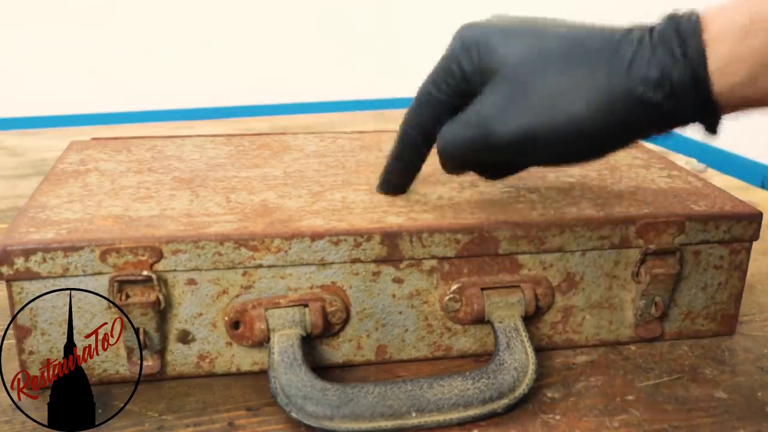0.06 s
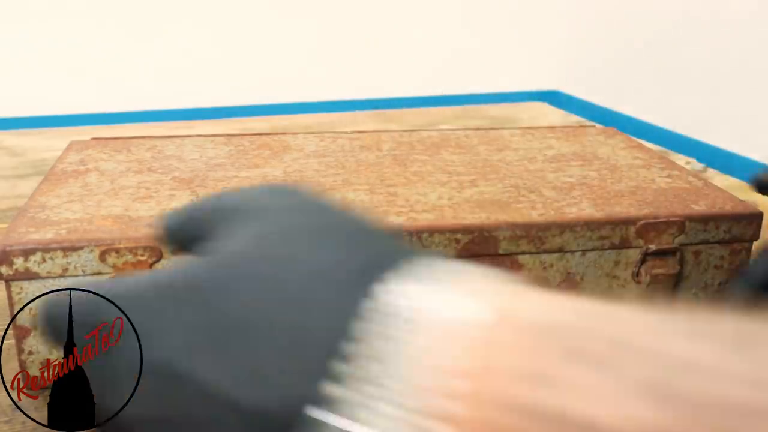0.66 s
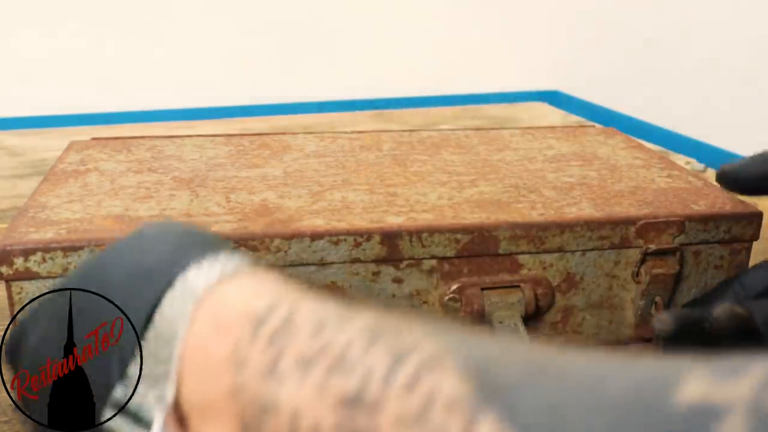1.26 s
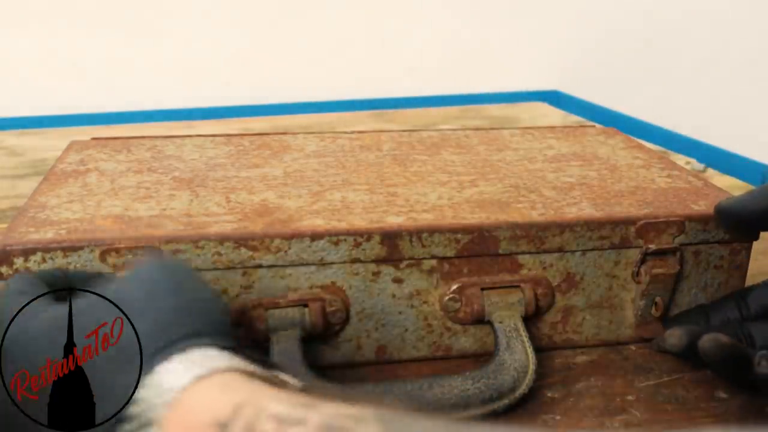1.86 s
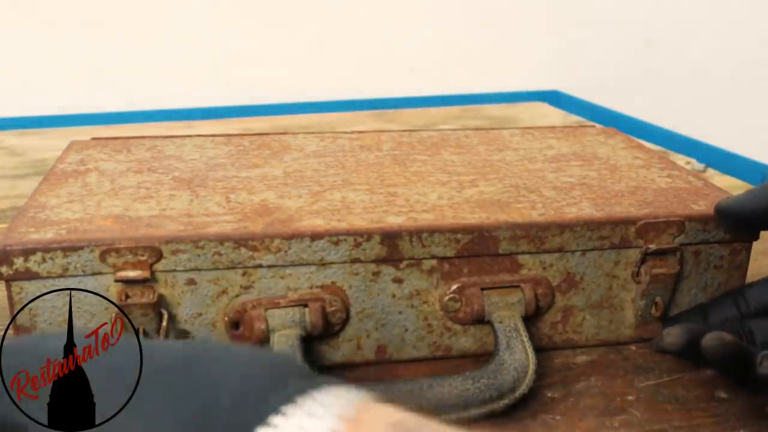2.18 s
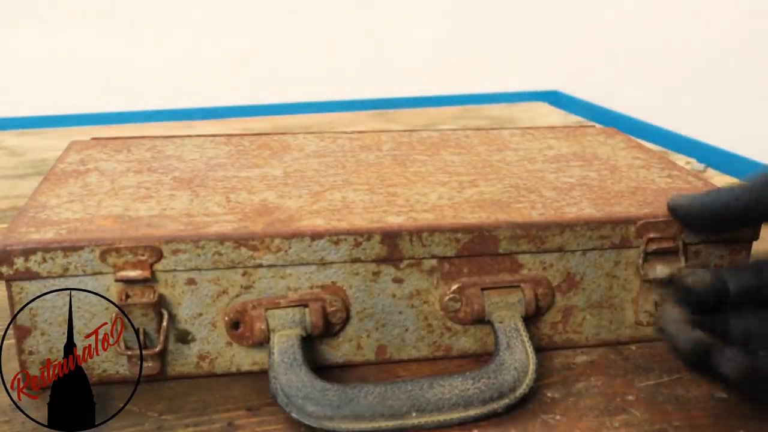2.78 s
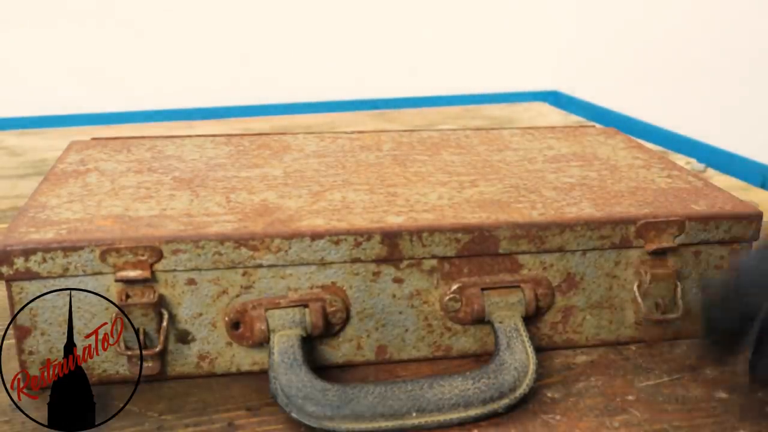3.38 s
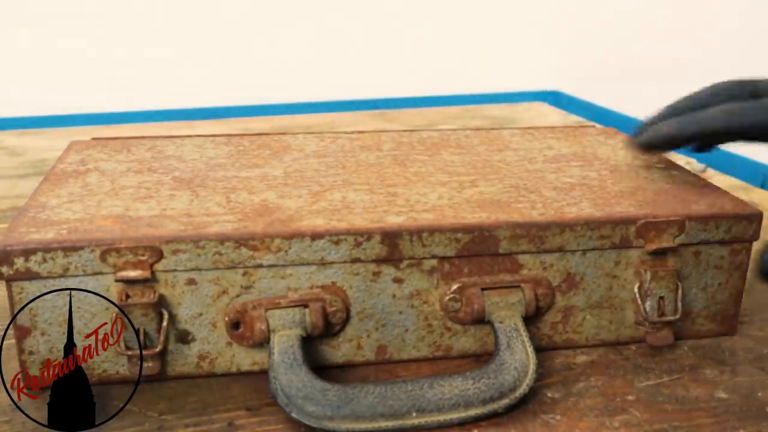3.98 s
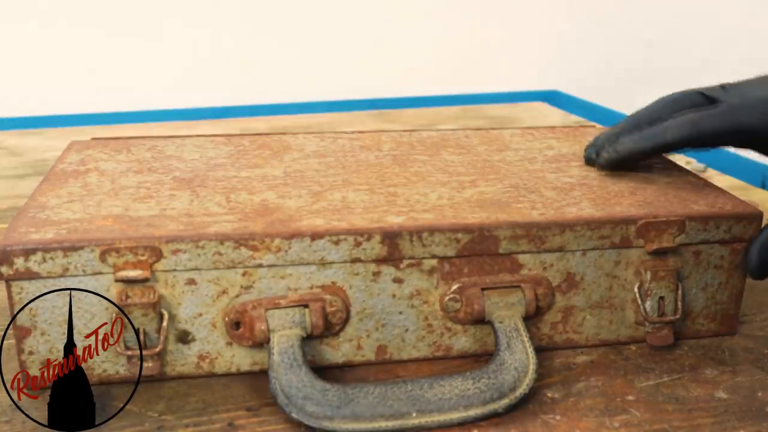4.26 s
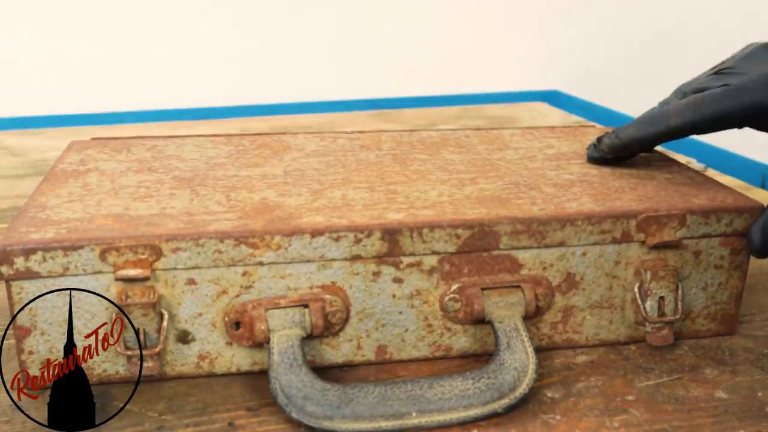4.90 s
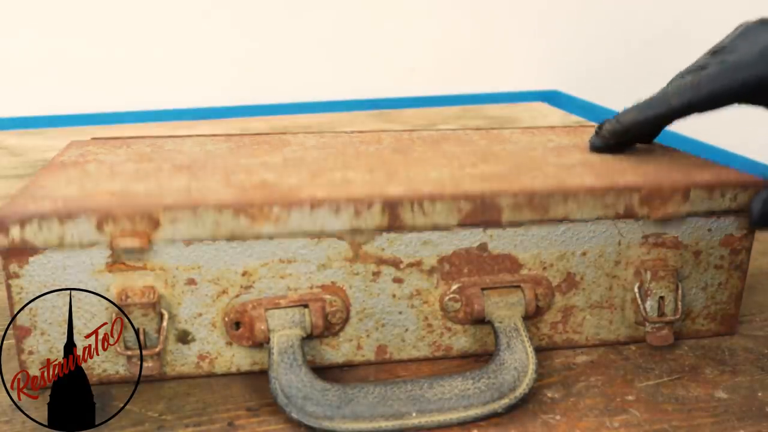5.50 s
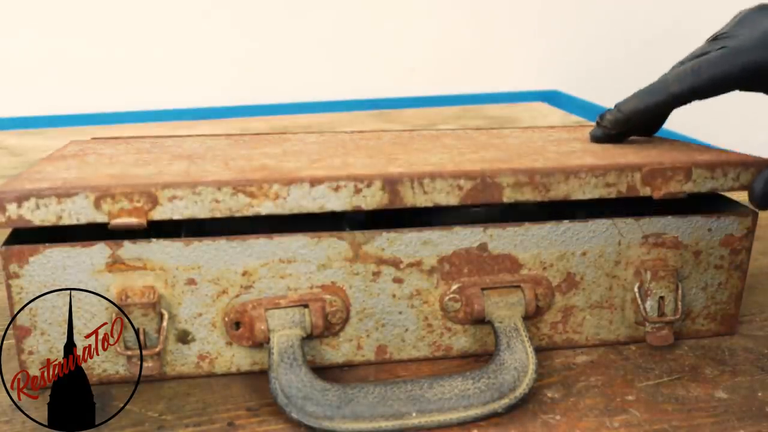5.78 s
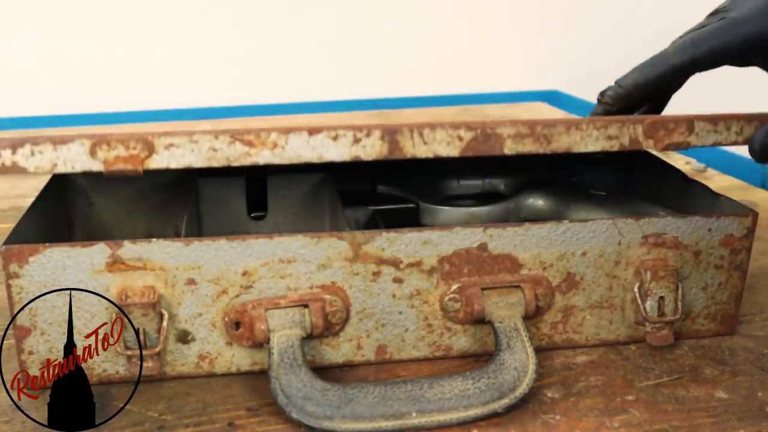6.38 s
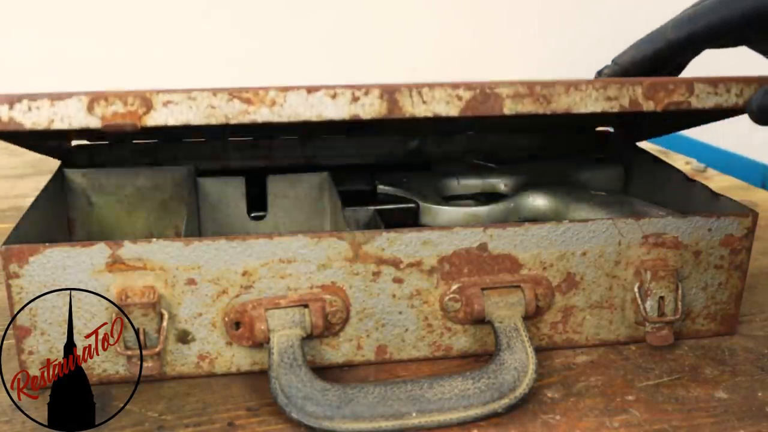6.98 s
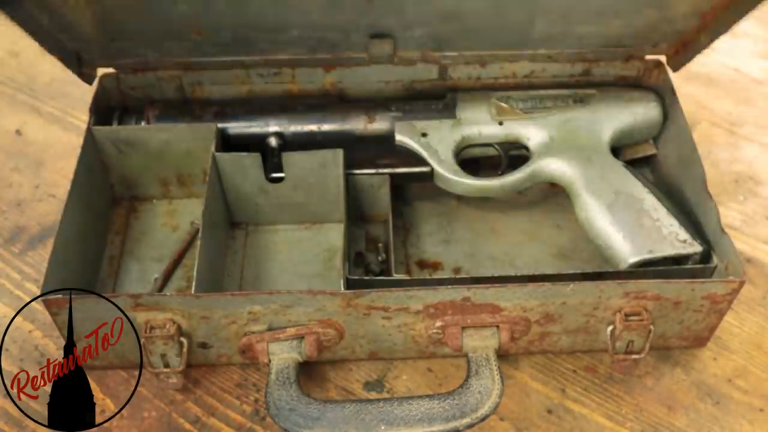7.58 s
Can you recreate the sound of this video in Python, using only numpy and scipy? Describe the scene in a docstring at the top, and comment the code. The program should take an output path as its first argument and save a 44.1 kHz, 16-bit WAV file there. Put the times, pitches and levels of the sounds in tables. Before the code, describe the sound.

A gloved finger lands on a hollow steel case with a dull thump and gritty rub at 0.1 seconds, then rubber swishes across the metal around 0.7. From 1 second, small steel clicks, grinding rust and faint glove creases build as the first latch is worked; it judders and snaps at 2.2. The second latch clicks from 2.6, cracks sharply at 2.85 and releases with the loudest quick double snap at 3.5, briefly ringing the box. Soft glove strokes follow around 3.7 and 4.4. After a near-silent pause, the lid comes unstuck at 5.5 with a small bump, click and scrape. Dry hinges scrape faintly from 6 seconds, with a slight knock at 6.7, a clearer dull one at 7 and a barely audible squeak at 7.5. Everything is close, in a small workshop with short reverberation and very low hiss and hum.

```python
"""A small workshop, one microphone close to a rusty sheet-steel case on a wooden bench.
Rubber gloves crease, a finger thumps the lid, rust grinds under a push and a glove brushes across.
Two stiff latches click and snap open, steel on steel, ringing the hollow case and the room.
The lid comes unstuck and rises, scraping, knocking and faintly squeaking on its dry hinges.
A noise suppressor and a limiter are in the chain, with low hiss and mains hum underneath."""
import sys
import numpy as np
from scipy import signal
from scipy.fft import rfft, irfft
from scipy.io import wavfile
from scipy.ndimage import uniform_filter1d, minimum_filter1d

SR = 44100
rng = np.random.default_rng(int(sys.argv[2]) if len(sys.argv) > 2 else 0)


def store_wav(level_fs):
    """Save 16-bit WAV to argv[1]."""
    pcm = np.round(np.clip(np.atleast_2d(level_fs), -1, 1) * 32767)
    wavfile.write(sys.argv[1], SR, pcm.T.astype(np.int16))


N = 337056
TIME = np.arange(N) / SR

# edges of the five bands of a blow (frequency [Hz])
BAND_EDGES = [70, 450, 1500, 4000, 8000, 16000]
# ringing of the steel box and its latch plates (frequency [Hz], level [dB])
CASE_MODES = [(135, -8.5), (222, 4.5), (262, 0.5), (320, -4.5), (350, -2), (468, 6.5), (571, -3),
              (690, 5.5), (792, 5), (881, 8.5), (926, -3.5), (998, 2), (1052, 0), (1112, 4), (1288, -2),
              (1379, -3.5), (1502, -7.5), (2030, -3), (2150, 1.5), (2482, 0.5), (2825, -6), (3064, -5),
              (3091, -12), (3203, -6.5), (3487, -9.5), (3520, -3.5), (4043, -7), (5265, -7), (5862, -6.5),
              (8710, -5)]
# colour of creasing rubber (frequency [Hz], level [dB])
RUBBER_COLOUR = [(500, -14), (2000, -10.5), (3400, -6), (4400, -5.5), (5800, -7.5), (8000, -14),
                 (12000, -16.5), (16000, -41)]


def amp(db):
    """Decibels to gain."""
    return 10 ** (np.asarray(db) / 20)


def unit(x):
    """Scales to an rms of one."""
    return x / np.sqrt(np.mean(x ** 2) + 1e-20)


def read(points, hz):
    """Reads a table along a logarithmic frequency axis."""
    f, value = np.transpose(points)
    return np.interp(np.log(hz + 1), np.log(f + 1), value)


def coloured(x, colour):
    """Gives x a spectrum, at an rms of one."""
    hz = np.fft.rfftfreq(len(x), 1 / SR)
    return unit(irfft(rfft(x) * amp(read(colour, hz)), len(x)))


def add(mix, s, sound):
    """Mixes a sound in at time s."""
    part = mix[round(s * SR):][:len(sound)]
    part += sound[:len(part)]


def gesture(s, hold_s, db, attack_s, release_s, sag_db_per_s=0):
    """Gain of a hand movement: swells to db at s, sags while held, fades; 30 dB per attack or release."""
    early = np.maximum(s - TIME, 0)
    late = np.maximum(TIME - s - hold_s, 0)
    sag_db = sag_db_per_s * np.clip(TIME - s, 0, hold_s)
    return amp(np.maximum(db - sag_db - 30 * (early / attack_s + late / release_s), -200))


def friction(colour, grains_per_s, spread_db, smooth):
    """Many tiny slips of uneven size over a smooth hiss, coloured by what they shake."""
    sizes = amp(spread_db * np.minimum(rng.exponential(1, N), 4)) * rng.choice([-1, 1], N)
    slips = unit(sizes * (rng.random(N) < grains_per_s / SR))
    return coloured(slips + smooth * rng.standard_normal(N), colour)


def tilted(x, rows, pivot_hz=1000):
    """Each push or stroke has its own brightness: tilts the spectrum by the last column, level kept."""
    hz, t, z = signal.stft(x, SR, nperseg=512)
    s, *_, tilt = np.transpose(rows)
    octaves = np.log2(np.clip(hz, 200, 6000) / pivot_hz)
    gain = amp(octaves[:, None] * np.interp(t, s, tilt))
    power = np.mean(abs(z) ** 2, axis=1, keepdims=True)
    gain /= np.sqrt((power * gain ** 2).sum(0) / power.sum())
    return signal.istft(z * gain, SR, nperseg=512)[1][:N]


def ringing(x, modes, ring_db, low_t60, high_t60):
    """Modes ring on after x shakes them, for low_t60 seconds at 200 Hz to high_t60 at 6 kHz."""
    t = np.arange(SR) / SR
    ring = np.zeros(SR)
    for hz, db in modes:
        t60 = read([(200, low_t60), (6000, high_t60)], hz)
        ring += amp(db - 60 * t / t60) * np.cos(2 * np.pi * hz * t)
    return amp(ring_db) * signal.fftconvolve(x, ring / np.linalg.norm(ring))[:N]


def contact_db(brightness, pivot_band, soft_roll_off=.6):
    """Tilt of the five bands: hard contact lifts the treble, soft contact rounds it off."""
    edges = np.log2(BAND_EDGES)
    octaves = (edges[:-1] + edges[1:]) / 2
    above_middle = np.maximum(octaves - octaves[2], 0)
    rounding_db = soft_roll_off * min(brightness, 0) * above_middle ** 2
    return brightness * (octaves - octaves[pivot_band]) + rounding_db


def knock(band_db, t60, part_hz, part_db, echo_s=.009, rise_s=.00089, crack_s=.00034):
    """One blow: a crack and its reflection off the wall behind, dense steel modes, the struck part's note."""
    # colour of struck steel (frequency [Hz], level [dB])
    steel_colour = [(70, -30.5), (130, -10), (220, 4), (380, -1), (560, -7), (950, 4.5), (1350, 2),
                    (1900, 1.5), (2600, 2), (3400, 1), (4300, -11.5), (5500, -4.5), (8000, -18.5),
                    (16000, -23)]
    t = np.arange(8192) / SR
    envelope = (1 - np.exp(-t / rise_s)) * amp(-60 * t / t60)
    crack = np.exp(-t / crack_s) + .74 * (t > echo_s) * np.exp(-abs(t - echo_s) / crack_s)
    burst = coloured(rng.standard_normal(len(t)), steel_colour) * envelope * (1 + 1.5 * crack)
    # small hard parts cannot drive the deepest bending of the lid
    low_cut = signal.butter(4, min(part_hz / 3, 165), "high", fs=SR, output="sos")
    burst = signal.sosfilt(low_cut, burst)
    out = np.zeros(len(t))
    for k, db in enumerate(band_db):
        band_pass = signal.butter(4, BAND_EDGES[k:k + 2], "band", fs=SR, output="sos")
        damping = np.exp(-.004 * BAND_EDGES[k] * t)  # rust damps the treble first
        band = signal.sosfilt(band_pass, burst) * damping
        out += amp(db) * band / np.linalg.norm(band)
    # the struck part rings as a close pair of modes, building up over its first cycle
    phase = 2 * np.pi * part_hz * t
    pair = np.sin(phase) + .6 * np.sin(phase * rng.uniform(1.02, 1.05))
    note = pair * (1 - np.exp(-t * part_hz)) * amp(-60 * t / (.99 * t60))
    out += amp(part_db) * note / np.linalg.norm(note)
    return np.sqrt(.02 * SR) * out  # levels count as rms over 20 ms


def glove_crinkle(creak_t60=.017):
    """Thin rubber creases in tiny bright snaps, which creak briefly, as the fingers flex and grip."""
    # flexes of the fingers (time [s], hold [s], level [dB])
    flexes = [(0.027, 0.064, -68), (0.094, .004, -60), (0.957, 0.013, -48), (1.123, .004, -53.5),
              (1.17, 0.0092, -40.5), (1.264, 0.0047, -51.5), (1.296, .003, -45), (4.242, 0.058, -60),
              (4.823, .003, -67), (4.89, 0.0038, -51.5), (4.934, 0.013, -63), (5.46, 0.0048, -69)]
    # stretched rubber squeaking against steel (frequency [Hz], level [dB])
    rubber_modes = [(3150, -7.5), (3450, -1), (5350, -4), (5900, -3)]
    effort = sum(gesture(*row, attack_s=.034, release_s=.068) for row in flexes)
    snaps = friction(RUBBER_COLOUR, grains_per_s=490, spread_db=1, smooth=.74)
    creak = unit(ringing(snaps, rubber_modes, 0, creak_t60, creak_t60))
    return unit(snaps + creak) * effort


def panel_thumps(ring_db=3):
    """Dull, bassy thumps of the panels: finger bumps, and the lid coming free."""
    # thumps (time [s], level [dB], brightness [dB/octave], t60 [s], panel pitch [Hz])
    thumps = [(0.1105, -26.5, 1.5, 0.046, 143), (0.149, -37, -8, 0.025, 348), (3.301, -48, -0.5, .11, 341),
              (4.889, -61, 4, 0.18, 354), (5.135, -63.5, -1.5, .08, 235), (5.165, -68, 3, 0.086, 150.4),
              (5.531, -53.5, 4, 0.052, 156.6)]
    # the five bands of a thump, bass first (level [dB])
    thump_bands = [0.5, -18, -28, -24.5, -28]
    out = np.zeros(N)
    for s, db, brightness, t60, hz in thumps:
        band_db = db + np.array(thump_bands) + contact_db(brightness, pivot_band=0)
        add(out, s, knock(band_db, t60, hz, db + ring_db))
    return out


def damped_panels(x):
    """Panels damped by the hands answer briefly at their modes and give a tinny colour."""
    return .7 * (x + ringing(x, CASE_MODES, ring_db=-8, low_t60=.1, high_t60=.05))


def rust_grind(snag_db=-16.5):
    """Rust flakes catch and let go as latches and lid are pushed, and now and then snag the glove."""
    # colour of grinding rust (frequency [Hz], level [dB])
    rust_colour = [(100, -43.5), (170, -21), (230, -3.5), (380, -1), (600, 5), (980, -6.5), (1500, -5.5),
                   (2500, -9.5), (3500, -8), (4400, -16), (6000, -18), (8500, -35), (16000, -37.5)]
    # pushes of the fingers (time [s], hold [s], level [dB], tilt [dB/octave])
    pushes = [(0.122, .3, -38, 1.5), (0.458, 0.22, -55, 6.5), (1.022, .17, -50, 3.5),
              (1.357, .07, -36, 3.5), (1.446, .17, -35, 3), (1.593, .2, -39, 3), (1.83, .1, -46, 4.5),
              (1.945, .17, -41.5, 1.5), (2.192, .08, -31, 1), (2.795, .03, -38, 1), (3.022, .17, -39.5, 5),
              (3.425, .02, -54.5, 8.5), (3.457, .02, -44.5, 3.5), (4.907, .06, -59, -6),
              (5.545, 0.013, -37, 3), (5.592, 0.071, -49, 6.5)]
    grit = friction(rust_colour, grains_per_s=900, spread_db=2.2, smooth=.8)
    snags = friction(RUBBER_COLOUR, grains_per_s=96, spread_db=3, smooth=0)
    effort = sum(gesture(*row[:3], attack_s=.045, release_s=.041, sag_db_per_s=57.5) for row in pushes)
    grinding = tilted(unit(damped_panels(grit)), pushes)
    return (grinding + amp(snag_db) * snags) * effort


def glove_brush(reflection=.27):
    """Rubber brushes the rough steel; the reflection off the lid shifts as the hand travels."""
    # colour of a sliding glove (frequency [Hz], level [dB])
    glove_colour = [(100, -38), (380, -26.5), (520, -7.5), (850, 4.5), (1300, 0.5), (2300, -1),
                    (3500, -0.5), (4300, -5), (5400, -8.5), (7500, -24), (11000, -31.5), (16000, -34)]
    # strokes (time of peak [s], hold [s], level [dB], attack [s], release [s], tilt [dB/octave])
    strokes = [(0.716, 0.055, -36.5, 0.21, 0.34, 1.4), (3.747, 0.24, -45.5, 0.26, 0.2, 2.5),
               (4.409, 0.16, -37, 0.088, 0.2, -1)]
    hiss = friction(glove_colour, grains_per_s=5000, spread_db=-1, smooth=.9)
    delay_s = np.interp(TIME, [.6, .85, 4.3, 4.8], [.0008, .0028, .0042, .0046])
    hiss = unit(hiss + reflection * np.interp(TIME - delay_s, TIME, hiss))
    effort = sum(gesture(*row[:-1], sag_db_per_s=24.5) for row in strokes)
    return tilted(hiss, strokes) * effort


def steel_click(db, brightness, thud_db, t60, hz, ring_db):
    """Steel meets steel, and the box under it adds a thud."""
    # the four bands above the thud (level [dB])
    click_bands = [-3.5, -2, -2, -11.5]
    steel_db = np.array(click_bands) + contact_db(brightness, pivot_band=2)[1:]
    return knock(db + np.r_[thud_db, steel_db], t60, hz, db + ring_db)


def latches(judder_s=2.1775, slip_gap_s=.0107, slip_count=4):
    """The latches click as they are worked; one sticks and slips just before it gives."""
    # clicks at the latches and rim (time [s], level [dB], brightness [dB/octave],
    # thud above level [dB], t60 [s], pitch of the struck part [Hz], its ring above level [dB])
    clicks = [(0.977, -34.5, -1.5, -42, 0.11, 3000, -11), (1.313, -37, 3, -16, .09, 6220, -6),
              (1.35, -33.5, -3, -19, 0.068, 2288, 2), (1.392, -36.5, -2, -14.5, 0.039, 925, -3.5),
              (1.499, -42, -2.5, -7.5, .06, 3150, -4.5), (1.522, -47.5, -7.5, -14, .05, 935, -3.5),
              (1.579, -29, 4, -16, 0.064, 5510, -1), (1.595, -40, 1, -18, .07, 3770, 2.5),
              (1.789, -34.5, -1.5, -24.5, 0.14, 932, -1), (1.873, -49, -2, -21.5, .02, 3630, -6),
              (1.896, -45, -4.5, -13, .045, 930, 0.5), (1.969, -31, 1, -22.5, 0.091, 1110, -6.5),
              (2.003, -25.5, 1.5, -33.5, .055, 2117, 2.5), (2.123, -35, -1.5, -23, 0.14, 3340, 0.5),
              (2.15, -39.5, -2, -16, 0.059, 3690, 5.5), (2.16, -31.5, -2, -28, 0.04, 3590, -7.5),
              (2.215, -19.5, 1, -25.5, 0.074, 1381, -5.5), (2.6317, -31.5, -5, -6.5, .08, 1340, -1),
              (2.7329, -21, 2, -11, 0.047, 5060, -2), (2.806, -22.5, 2, -5.5, 0.033, 3240, -10),
              (2.819, -25.5, -1.5, 1, 0.12, 1400, -4), (2.8478, -13.5, -1.5, -8, .034, 3425, -3.5),
              (2.898, -29.5, -3.5, -14.5, .04, 1160, -5.5), (3.0325, -29, -3.5, -11, 0.031, 1175, -11),
              (3.091, -28.5, -2.5, -6.5, 0.069, 1190, -11.5), (3.121, -46, 1.5, -5.5, 0.076, 7634, -4.5),
              (3.459, -31, 4, -19, 0.045, 4950, -6.5), (3.4655, -14, 0, -11.5, .065, 3250, 1),
              (3.4945, -11.5, 5.5, -26.5, .035, 2956, 1.5), (3.4992, -17, 0, -34.5, .044, 3540, -0.5),
              (5.535, -39.5, -0.5, -5, 0.062, 1370, -5)]
    out = np.zeros(N)
    for s, *blow in clicks:
        add(out, s, steel_click(*blow))
    # the catch tightens: each slip is harder, brighter and higher than the last
    for k in range(slip_count):
        slip = steel_click(db=-39.5 + 4.5 * k, brightness=-6 + 2.7 * k, thud_db=-20,
                           t60=.042, hz=865 + 25 * k, ring_db=5.5)
        add(out, judder_s + k * slip_gap_s, slip)
    return out


def hinge_scrape():
    """The dry hinge slips unevenly each time the lid is raised further."""
    # colour of the hinge (frequency [Hz], level [dB])
    hinge_colour = [(150, -40), (270, -8), (400, 1), (540, -8), (720, 10), (1150, -19.5), (2450, -19),
                    (2720, -13.5), (2950, -36), (3300, -7), (3900, -37), (5100, -38), (5500, -16),
                    (6100, -36), (16000, -45)]
    # turns of the hinge (time [s], hold [s], level [dB])
    turns = [(5.931, 0.037, -71.5), (6.179, 0.12, -61.5), (6.7, .11, -58), (6.969, 0.073, -52),
             (7.271, .01, -65.5), (7.52, 0.11, -69.5)]
    effort = sum(gesture(*row, attack_s=.08, release_s=.11, sag_db_per_s=44) for row in turns)
    return friction(hinge_colour, grains_per_s=190, spread_db=-6.5, smooth=.46) * effort


def lid_ring(x):
    """Standing free of the case, the lid rings at modes of its own."""
    # modes of the free lid (frequency [Hz], level [dB])
    lid_modes = [(331, 4), (373, 16.5), (410, -15), (455, 24.5), (578, 9), (667, -13), (702, -13), (875, 5),
                 (1010, 18.5), (2700, 17.5), (3250, -5)]
    return ringing(x, lid_modes, ring_db=-11, low_t60=.062, high_t60=.17)


def lid_knocks(t60=.072, ring_db=2):
    """The rising lid drops into the slack of its hinges with a dull knock."""
    # drops (time [s], level [dB], brightness [dB/octave], pitch [Hz])
    drops = [(6.687, -54.5, -6.5, 401), (6.964, -38.5, 1.5, 687)]
    # the five bands of a knock, bass first (level [dB])
    lid_bands = [-22.5, -4.5, -16, -54, -50]
    out = np.zeros(N)
    for s, db, brightness, hz in drops:
        band_db = db + np.array(lid_bands) + contact_db(brightness, pivot_band=0)
        add(out, s, knock(band_db, t60, hz, db + ring_db))
    return out


def hinge_squeak(waver=.02, flutter_db=3):
    """Stick and slip in the hinge gives a faint, unsteady whine as the lid swings back."""
    # course of the squeak (time [s], level [dB], pitch [Hz])
    course = [(7.499, -81, 378.6), (7.565, -67, 361.5), (7.64, -68, 366)]
    # its partials (multiple of the pitch, level [dB])
    partials = [(3, 5), (4, -5), (5, -7)]
    s, course_db, hz = np.transpose(course)
    drift, grip = (unit(uniform_filter1d(noise, size=300)) for noise in rng.standard_normal((2, N)))
    cycles = np.cumsum(np.interp(TIME, s, hz) * (1 + waver * drift)) / SR
    whine = sum(amp(db) * np.sin(2 * np.pi * k * cycles) for k, db in partials)
    level_db = np.interp(TIME, s, course_db, left=-150, right=-150)
    return amp(level_db + flutter_db * grip) * whine


def workshop_reverb(x, onset_s=.0055):
    """The small room returns a diffuse tail in which each band dies at its own speed."""
    # decay of the room (frequency [Hz], t60 [s])
    room_t60 = [(100, 0.88), (300, 0.61), (1000, 0.65), (3500, 0.67), (7000, 0.65), (15000, 0.39)]
    # colour of its tail (frequency [Hz], level [dB])
    room_colour = [(100, -3.5), (300, 4.5), (1000, 0), (3500, -0.5), (7000, -3.5), (15000, -1.5)]
    hz, t, z = signal.stft(rng.standard_normal(SR), SR, nperseg=256)
    z *= amp(read(room_colour, hz)[:, None] - 60 * t / read(room_t60, hz)[:, None])
    tail = signal.istft(z * (1 - np.exp(-t / onset_s)), SR, nperseg=256)[1]
    return signal.fftconvolve(x, tail / np.linalg.norm(tail))[:N]


def limiter(x, ceiling=.49, recovery_db_per_s=140):
    """Holds peaks at the ceiling and recovers slowly, so the ring swells back after a hard snap."""
    over_db = np.maximum(20 * np.log10(abs(x[0]) / ceiling + 1e-9), 0)
    fall = TIME * recovery_db_per_s
    held_db = np.maximum.accumulate(over_db + fall) - fall
    return x * uniform_filter1d(minimum_filter1d(amp(-held_db), size=41), size=41)


def scene(knock_room_db=-13, rub_room_db=-15, lid_room_db=-19):
    """Close up, blows and rubbing ring the shut case, later the free lid; the room sits behind them."""
    on_case = latches() + panel_thumps()
    on_lid = lid_knocks() + hinge_scrape()
    brushing, grit = glove_brush(), rust_grind()
    case_drive = on_case + .7 * grit + .21 * brushing
    case_ring = ringing(case_drive, CASE_MODES, ring_db=-25.5, low_t60=.31, high_t60=.22)
    room = workshop_reverb(amp(knock_room_db) * damped_panels(on_case)
                           + amp(rub_room_db) * (brushing + grit)
                           + amp(lid_room_db) * on_lid)
    direct = on_case + on_lid + brushing + grit + glove_crinkle() + hinge_squeak()
    return (direct + case_ring + lid_ring(on_lid) + room)[None]


def record(dry, gate_db=-97, hum_db=-73, hum_hz=49.8, hiss_db=-72.5, top_hz=15900):
    """A noise suppressor swallows faint tails; hiss and mains hum remain; a limiter holds the peaks."""
    # room tone at the microphone (frequency [Hz], level [dB])
    room_tone = [(15, -30), (25, -3), (55, -17), (74, -7.5), (97, -6.5), (217, -12), (326, -7.5),
                 (531, -13.5), (796, -11.5), (1520, -21.5), (3340, -21.5), (14800, -33.5), (16000, -50.5)]
    z = signal.stft(dry, SR, nperseg=512)[2]
    power = uniform_filter1d(abs(z) ** 2, size=5, axis=1)
    power = uniform_filter1d(power, size=3, axis=2).clip(0)
    gate = power / (power + amp(gate_db) ** 2)
    gated = signal.istft(z * gate, SR, nperseg=512)[1][:, :N]
    hum = amp(hum_db) * np.sqrt(2) * np.sin(2 * np.pi * hum_hz * TIME)
    hiss = amp(hiss_db) * coloured(rng.standard_normal(N), room_tone)
    low_pass = signal.firwin(511, top_hz, window=("kaiser", 9), fs=SR)
    return signal.oaconvolve(limiter(gated + hum + hiss), low_pass[None], "same")


dry = scene()
out = record(dry)
store_wav(out)
```